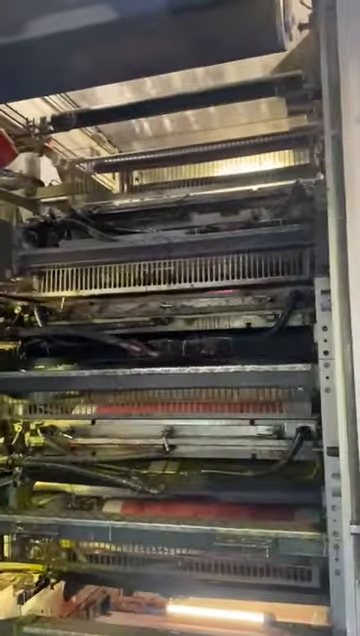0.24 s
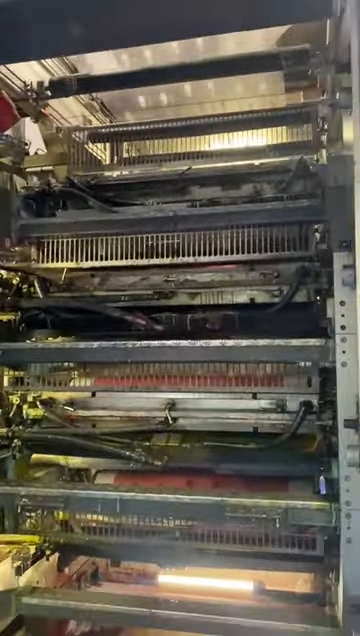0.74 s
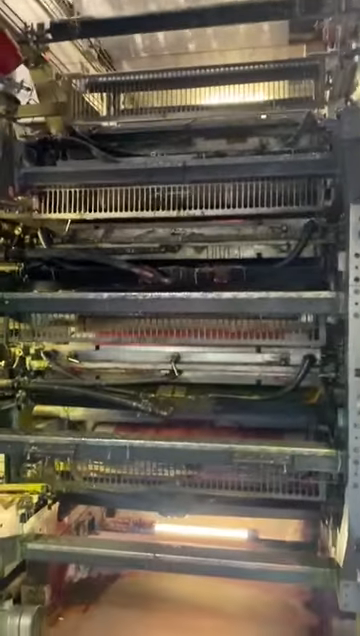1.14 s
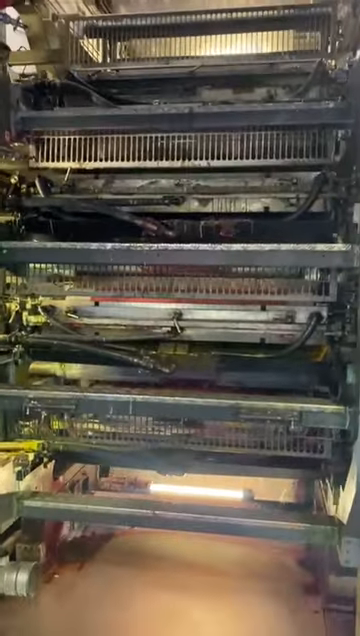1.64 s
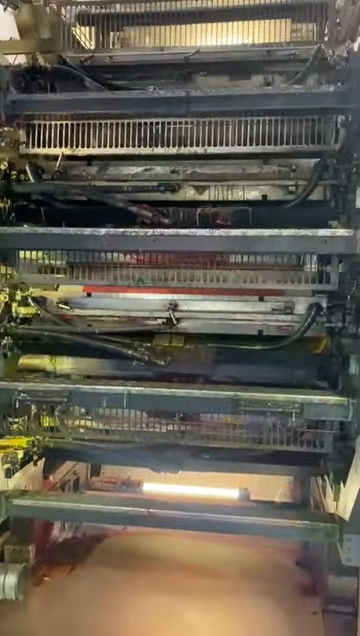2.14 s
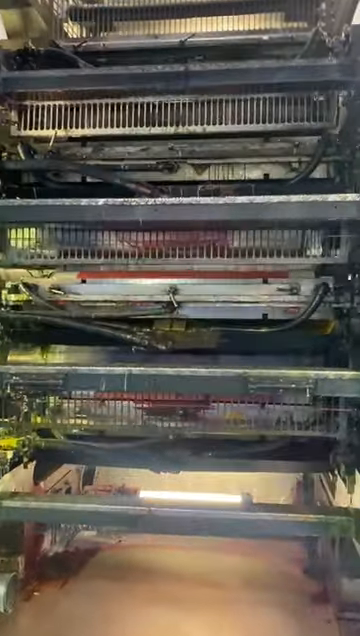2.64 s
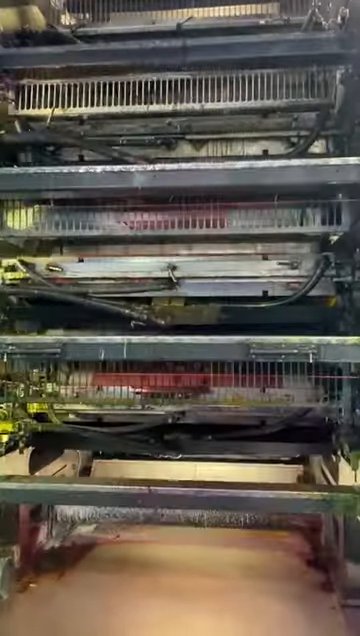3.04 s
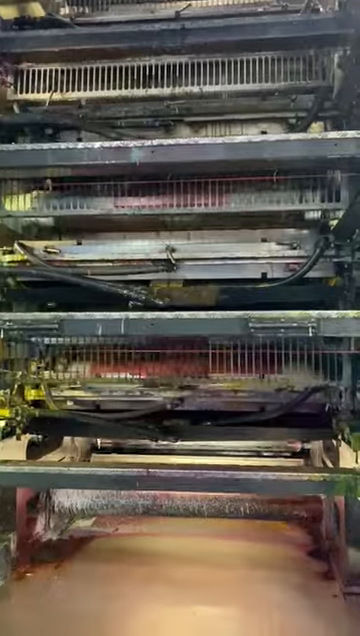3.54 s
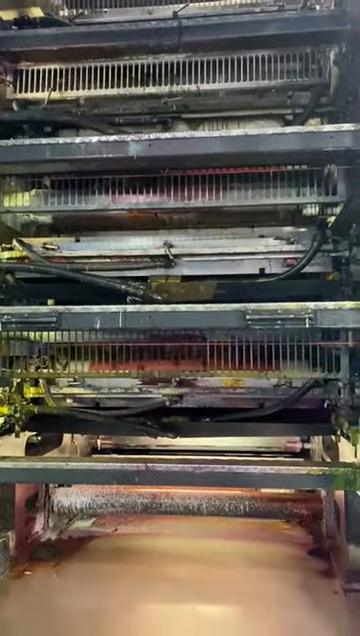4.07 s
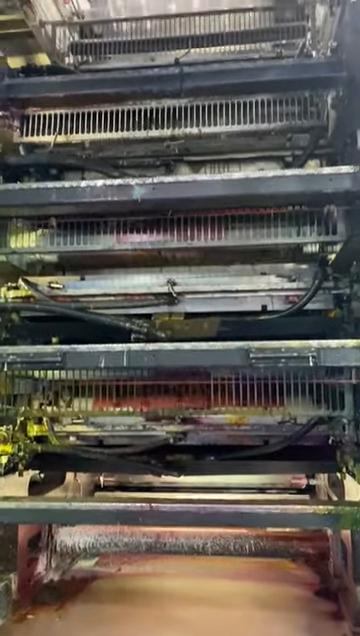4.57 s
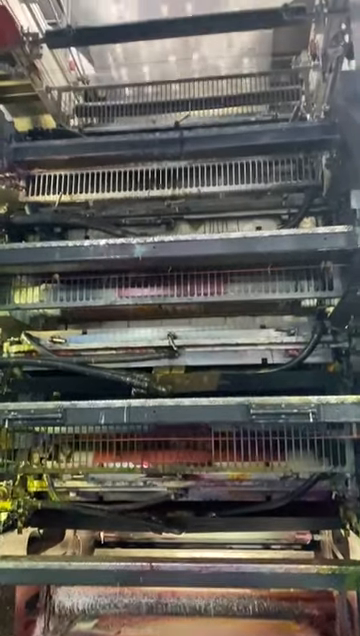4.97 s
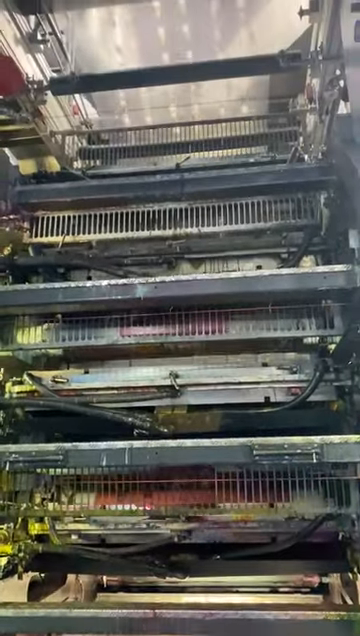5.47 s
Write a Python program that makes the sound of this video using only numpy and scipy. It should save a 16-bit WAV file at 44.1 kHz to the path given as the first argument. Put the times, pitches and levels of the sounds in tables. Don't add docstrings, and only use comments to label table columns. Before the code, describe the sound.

A large printing press runs steadily in a factory hall, a low droning roar under constant bright hiss, with faint squeaks and a wavering high whine.

```python
import sys
import numpy as np
from scipy import signal
from scipy.fft import dct
from scipy.io import wavfile
from scipy.ndimage import uniform_filter1d

SR = 44100
rng = np.random.default_rng(int(sys.argv[2]) if len(sys.argv) > 2 else 0)


def put_to_file(sound):
    columns = np.atleast_2d(sound).T
    safe = np.clip(columns, -1, 1)
    whole_steps = np.round(safe * 32767)
    wavfile.write(sys.argv[1], SR, whole_steps.astype(np.int16))


def volts_from_decibels(level):
    exponent = np.asarray(level, float) / 20
    return 10 ** exponent


N = 251811


def evened(x):
    return x / np.sqrt(np.mean(abs(x) ** 2) + 1e-20)


def smooth(x, size_0, size_1):
    return uniform_filter1d(uniform_filter1d(x, size=size_0, axis=0), size=size_1, axis=1)


def read(points, hz, column=1):
    table = np.transpose(points)
    return np.interp(np.log(hz + 1), np.log(table[0] + 1), table[column])


def ports(common, other, hz):
    # pitch_hz, likeness_0_to_1, left_lead_rad, left_minus_right_db
    port_pair = [(70, .998, 0, -.4), (450, .99, -.03, -3), (950, .83, -.09, -2.7), (1900, .96, .03, -.1),
                 (2400, .62, .6, .1), (2900, .23, 1.2, -.9), (3900, .65, .66, -.3), (4500, .51, .84, -2.5),
                 (5200, .93, .13, .1), (6100, .72, 1.8, -.1), (6600, .96, 3, 0), (8050, .95, 3.25, 0),
                 (8950, .5, 4.7, -.1), (9700, .96, 6.2, 0)]
    same = np.clip(read(port_pair, hz, column=1), 0, 1)
    lead = np.exp(.5j * read(port_pair, hz, column=2))
    tilt = volts_from_decibels(read(port_pair, hz, column=3) / 2)
    alike = np.sqrt((1 + same) / 2) * common
    apart = np.sqrt((1 - same) / 2) * other
    return np.array([(alike + apart) * lead * tilt, (alike - apart) / lead / tilt])


def waver(width_hz):
    hop = 32
    pole = np.exp(-np.pi * max(width_hz, .5) * hop / SR)
    a, b = rng.standard_normal((2, N // hop + 2000))
    slow = signal.lfilter([1], np.convolve([1, -pole], [1, -pole]), a + 1j * b)[1998:]
    return evened(np.interp(np.arange(N) / hop, np.arange(len(slow)), slow))


def wash(spectrum, level_db, db_per_s, patchy_db, flicker_db):
    frames, hz = N // 512 + 5, np.fft.rfftfreq(2048, 1 / SR)
    a, b, c, d, patches = rng.standard_normal((frames, 1025, 5)).T
    patches = evened(smooth(patches, 6, 7))
    flicker = evened(uniform_filter1d(rng.standard_normal(frames), size=5))
    colour = volts_from_decibels(read(spectrum, hz)[:, None] + patchy_db * patches + flicker_db * flicker)
    z = ports(colour * (a + 1j * b), colour * (c + 1j * d), hz[:, None])
    x = signal.istft(z, nperseg=2048, noverlap=1536)[1][:, :N]
    mono_rms = np.sqrt(np.mean(x.mean(0) ** 2))
    return x / mono_rms * volts_from_decibels(level_db + db_per_s * np.arange(N) / SR)


def resonance(hz, width_hz):
    t = np.arange(N) / SR
    ring = ports(waver(width_hz), waver(width_hz), hz) * np.exp(2j * np.pi * hz * t)
    return np.sqrt(2) * ring.real


def glides(events):
    out = np.zeros((2, N))
    for start_s, hz, glide_hz, length_s, db in events:
        t = np.arange(round(length_s * SR)) / SR
        turns = hz * t + glide_hz * t ** 2 / 2 / length_s
        tone = volts_from_decibels(db) * 2 * np.hanning(len(t)) * np.exp(2j * np.pi * turns)
        out[:, round(start_s * SR):][:, :len(t)] += ports(tone, 0 * tone, hz).real
    return out


def roar():
    # pitch_hz, density_db_per_hz
    roar_spectrum = [(27, -34), (50, -5), (60, -1.5), (110, 0.5), (170, -3.5), (250, -1), (400, -6.5),
                     (600, -8.5), (850, -12), (1050, -15), (1600, -18.5), (2100, -18.5), (2350, -19.5),
                     (2900, -47.5)]
    return wash(roar_spectrum, level_db=-17.5, db_per_s=-.1461, patchy_db=1.0, flicker_db=.4)


def hiss():
    # pitch_hz, density_db_per_hz
    hiss_spectrum = [(2000, -27.5), (2480, 2), (2950, 0.5), (3400, -2), (3700, -1.5), (4080, -5),
                     (4550, -3), (4850, 0.5), (5400, 0), (6250, -1), (7100, -7.5), (8700, -8.5),
                     (10400, -10.5), (11900, -15)]
    return wash(hiss_spectrum, level_db=-26.5, db_per_s=.0853, patchy_db=1.5, flicker_db=.3)


def hums():
    # pitch_hz, width_hz, level_db
    hum_tones = [(85.7, 7.9, -40), (118, 18, -36.5), (190.5, 4.4, -39), (256, 9, -32), (303.2, 7, -37),
                 (452.6, 3.6, -37), (550, 3.1, -41.5), (2122, 60, -42.5), (3686, 270, -45),
                 (4300, 54, -49.5)]
    return sum(volts_from_decibels(db) * resonance(hz, width_hz) for hz, width_hz, db in hum_tones)


def body():
    t = np.arange(N) / SR
    return volts_from_decibels(-34 - 1.2 * t) * resonance(hz=710, width_hz=250)


def surges():
    # start_s, pitch_hz, glide_hz, length_s, level_db
    booms = [(.16, 326, 0, .24, -31), (.23, 613, 0, .2, -38), (.23, 775, 0, .2, -41),
             (.86, 445, 0, .24, -32), (1.08, 775, 25, .2, -39), (1.15, 581, 0, .2, -38),
             (1.4, 340, 0, .2, -35), (1.4, 118, 14, .24, -29), (1.43, 703, 0, .2, -39),
             (1.5, 193, 0, .4, -30), (1.55, 150, 8, .2, -30), (1.76, 552, 0, .2, -36),
             (1.99, 391, 0, .2, -35), (2.02, 305, 0, .3, -31), (2.09, 671, 0, .2, -38),
             (2.55, 222, 0, .22, -31), (2.62, 412, 0, .2, -34), (2.63, 610, 0, .2, -38),
             (2.95, 112, -30, .24, -29), (3.1, 66, -4, .26, -28), (2.4, 262, 0, .3, -31),
             (3.42, 100, 0, .3, -30), (4.4, 252, 0, .8, -33), (3.52, 638, 0, .2, -38),
             (3.87, 473, 0, .2, -38), (3.88, 301, 0, .22, -33), (4.27, 513, 0, .2, -38),
             (4.51, 742, 0, .2, -39), (4.68, 301, 0, .22, -32), (5.37, 771, 0, .2, -38),
             (5.39, 506, 0, .2, -37), (5.42, 78, 30, .24, -31)]
    return glides(booms)


def squeaks():
    # start_s, pitch_hz, glide_hz, length_s, level_db
    short_tones = [(.62, 3990, 90, .07, -46), (.1, 3660, 0, .06, -41), (.59, 5544, 0, .06, -41),
                   (1.11, 2390, 0, .06, -42), (.86, 5800, 0, .07, -37), (1.72, 2520, 80, .05, -35),
                   (1.995, 2580, 0, .04, -35), (1.993, 3610, 0, .04, -34), (2.17, 2740, 290, .17, -37),
                   (2.35, 2300, 300, .08, -35), (2.57, 1950, 300, .09, -37), (1.58, 2110, 0, .06, -39),
                   (1.6, 2982, 0, .06, -42), (1.82, 5307, 0, .06, -39), (2.02, 5000, 160, .08, -41),
                   (2.39, 2520, 250, .09, -37), (4.23, 2680, 0, .06, -41), (4.3, 4145, 0, .06, -43),
                   (4.72, 2691, 0, .06, -41), (2.95, 5440, 0, .7, -47), (.95, 5514, 0, .8, -48),
                   (4.46, 3197, 0, .06, -44), (4.54, 2950, 0, .06, -42), (3.54, 2900, 0, .04, -39),
                   (4.175, 4145, 0, .05, -43), (5.4, 2550, 0, .06, -37), (5.41, 2150, 0, .05, -34),
                   (5.56, 4400, 50, .05, -41), (.6, 9957, 0, .3, -52), (1.19, 9957, 0, .12, -46),
                   (1.4, 9957, 0, .1, -48), (1.78, 9957, 0, .12, -49), (2.89, 9957, 0, .12, -46),
                   (1.5, 10037, 0, .12, -48)]
    return glides(short_tones)


def bearings():
    # pitch_hz, width_hz, level_db
    bearing_tones = [(5254, 12, -49), (5290, 14, -51), (5322, 10, -50), (5442, 3, -48), (5514, 10, -49)]
    return sum(volts_from_decibels(db) * resonance(hz, width_hz) for hz, width_hz, db in bearing_tones)


def whine():
    # middle_s, length_s, shift_hz, level_db
    echo_swells = [(.03, .5, 0, -38), (.45, .2, -5, -47), (.75, .6, 0, -45.5), (1.05, .3, -2, -51),
                   (1.34, .26, 1, -40.5), (1.6, .12, 0, -37), (1.87, .24, -3, -46), (2.15, .5, 2, -42.5),
                   (2.43, .36, -4, -43.5), (2.76, .16, -2, -40.5), (2.92, .22, -1, -44),
                   (3.2, .26, -4, -41), (3.46, .74, -3, -37.5), (3.62, .12, -3, -38), (3.76, .2, -3, -43),
                   (4.08, .3, -4, -49), (4.25, .14, -3, -47), (4.5, .3, -3, -45), (4.72, .32, -3, -40),
                   (5.08, .26, 2, -40.5), (5.35, .16, -4, -41.5), (5.56, .4, 0, -48)]
    whine_hz, shaft_hz = 10000, 38.75
    lower_db, upper_db, side_width_hz = -55, -54.5, 16
    bed_db, bed_width_hz, flutter, flutter_width_hz = -52, 18, .3, 16
    t = np.arange(N) / SR
    middle_s, length_s, shift_hz, level_db = np.transpose(echo_swells)[..., None]
    arches = np.cos(np.pi * np.clip((t[::32] - middle_s) / length_s, -.5, .5))
    height = np.interp(t, t[::32], np.sqrt(((volts_from_decibels(level_db) * arches) ** 2).sum(0)))
    drift_hz = np.interp(t, middle_s[:, 0], shift_hz[:, 0])
    drift = np.exp(2j * np.pi * np.cumsum(drift_hz) / SR)
    steady = np.exp(2j * np.pi * whine_hz * t)
    shaft = np.exp(2j * np.pi * shaft_hz * t)
    lower = volts_from_decibels(lower_db) * waver(side_width_hz) / shaft
    upper = volts_from_decibels(upper_db) * waver(side_width_hz) * shaft
    swells = height * drift * (1 + flutter * waver(flutter_width_hz))
    bed = volts_from_decibels(bed_db) * waver(bed_width_hz)
    tone = np.sqrt(2) * (swells + bed + lower + upper) * steady
    return (tone * np.exp([[.14j], [-.14j]])).real


def scene():
    return roar() + hiss() + hums() + body() + surges() + squeaks() + bearings() + whine()


def dropouts(parts):
    # pitch_hz, sum_sd, difference_sd
    rarity = [(300, 3, 2.2), (750, 3, 2), (1300, 2.4, 1.1), (1600, 2.2, 1.5), (2000, 2, .2),
              (2300, 1.7, 1.2), (3000, 1.3, 3), (3500, 1.3, 2.4), (4000, 1.2, .7), (4300, 1.15, 1.5),
              (4700, 1.5, 1.2), (5300, 2, .1), (5700, 1.9, 1.2), (6200, 1.4, 3), (6300, .3, 3),
              (6420, -.4, 3), (6620, -.9, 2.5), (6700, -3, 2.5), (8150, -3, 1.6), (8230, -.1, 1.4),
              (8500, .4, 1.2), (8930, .6, .7), (8980, .9, -.1), (9400, 1.2, -.3), (10000, 1.5, -1),
              (10800, 1.3, -2.5), (11400, 1.1, -2), (11620, .5, -2.5), (11730, -2, -3)]
    # pitch_hz, sum_sd, difference_sd
    late_strain = [(1000, .2, -.4), (1500, .2, -.4), (2000, .2, .1), (3500, .2, .3), (4000, .2, .6),
                   (5000, .2, .1), (6000, .3, 0), (6400, .45, 0), (8000, .2, 0), (9200, .2, .25),
                   (11000, .1, 0)]
    sd_per_db, sink_db, shallow_db, strain_s = .11, 90, 19, 2.9
    hz = (np.arange(1024) + .5) * SR / 2048
    t = np.arange(parts.shape[1])[:, None] * 1024 / SR
    low = hz < 6200
    sum_strip = np.arange(1024) // np.where(low, 4, 8) + 512 * low
    chance = evened(uniform_filter1d(rng.standard_normal(parts.shape), size=2, axis=1))
    chance = np.array([chance[0][:, sum_strip], chance[1][:, np.arange(1024) // 8]])
    whine_power = (parts[0][:, hz > 9000] ** 2).max(1)
    tone_db = 10 * np.log10(uniform_filter1d(whine_power, size=7) + 1e-12)
    excess_db = np.maximum(tone_db - np.median(tone_db), 0)[:, None]
    reach = np.clip(abs(hz - 9500) / 800, 0, 1) * (hz > 8000) * np.clip((12200 - hz) / 1200, 0, 1)
    masked = sd_per_db * excess_db * reach
    rare = np.array([read(rarity, hz, column) for column in (1, 2)])[:, None]
    strain = np.array([read(late_strain, hz, column) for column in (1, 2)])[:, None]
    over = chance + masked * [[[1]], [[0]]] + strain * np.tanh(2 * (t - strain_s)) - rare
    over = over - 9 * (abs(hz - 10000) < 60)
    deepest_db = np.where(low * [[[1]], [[0]]], shallow_db, 90)
    return volts_from_decibels(-np.clip(sink_db * over, 0, deepest_db))


def thinned(x):
    # pitch_hz, level_db
    floor_db = [(200, -25), (800, -24.5), (1500, -18.5), (2600, -19.5), (3300, -20.5), (4100, -19.5),
                (5300, -20.5), (6300, -17.5), (7000, -15), (8400, -11.5), (9300, -10.5), (10100, -14),
                (10800, -11), (11400, -8), (11800, -7)]
    # start_s, low_hz, high_hz, share
    lopsided = [(.04, 9930, 10070, .4), (.17, 11400, 11550, 1), (.27, 11050, 11700, 1),
                (.3, 11050, 11700, 1), (1.33, 9930, 10070, .4), (1.39, 11450, 11700, 1),
                (1.74, 11050, 11700, 1), (2.09, 11200, 11400, 1), (2.21, 9930, 10070, .4),
                (2.84, 11400, 11550, 1), (3.18, 9930, 10070, .5), (3.45, 9930, 10070, .3),
                (3.48, 9930, 10070, .3), (3.57, 9930, 10070, .3), (4.69, 9930, 10070, .4),
                (4.69, 11050, 11500, 1), (4.93, 11050, 11700, 1), (5.01, 9930, 10070, .4)]
    least_share, loose_db, masking, full_hz = .13, 2.5, .9, 3700
    half, offset = 1024, 325
    window = signal.windows.kaiser_bessel_derived(2 * half, 4 * np.pi)
    pair = np.pad([x[0] + x[1], x[0] - x[1]], ((0, 0), (2 * half - offset, 2 * half)))
    count = pair.shape[1] // half - 1
    index = half * np.arange(count)[:, None] + np.arange(2 * half)
    a, b, c, d = np.split(window * pair[:, index], 4, axis=2)
    folded = np.concatenate([-c[..., ::-1] - d, a - b[..., ::-1]], axis=2)
    parts = dct(folded, type=4, norm="ortho")
    bands = (parts * dropouts(parts)).reshape(2, count, -1, 8)
    power = (bands ** 2).sum(0).mean(-1, keepdims=True)
    loudness = np.sqrt(abs(uniform_filter1d(power, size=7, axis=1))) + 1e-9
    hz = (np.arange(half // 8)[:, None] + .5) * 4 * SR / half
    drift = evened(smooth(rng.standard_normal(loudness.shape), 2, 3))
    step = loudness * volts_from_decibels(read(floor_db, hz) + loose_db * drift) / .6
    own = uniform_filter1d((bands ** 2).mean(-1, keepdims=True), size=3, axis=1)
    own = np.sqrt(abs(uniform_filter1d(own, size=3, axis=2))) + 1e-9
    step = step * (own.max(0) / own) ** (masking * np.minimum(hz / full_hz, 1))
    whole = np.sign(bands) * np.floor(abs(bands) / step + .4)
    whole *= (whole != 0).mean(-1, keepdims=True) > least_share
    kept = (whole * step).reshape(folded.shape)
    line_hz = np.arange(half) * SR / 2 / half
    for start_s, low_hz, high_hz, share in lopsided:
        frame = round((start_s * SR - offset) / half) + 1
        strip = (line_hz > low_hz) & (line_hz < high_hz)
        kept[1, frame, strip] = -share * kept[0, frame, strip]
    u, v = np.split(dct(kept, type=4, norm="ortho"), 2, axis=2)
    frames = window * np.concatenate([v, -v[..., ::-1], -u[..., ::-1], -u], axis=2)
    lapped = (frames[:, 1:, :half] + frames[:, :-1, half:]).reshape(2, -1)
    total, apart = lapped[:, half - offset:][:, :N]
    return np.array([total + apart, total - apart]) / 2


def top_cut(x):
    return signal.sosfilt(signal.butter(12, 11725, fs=SR, output="sos"), x)


def record(dry):
    mix = thinned(dry)
    return top_cut(mix)


dry = scene()
out = record(dry)
put_to_file(out)
```